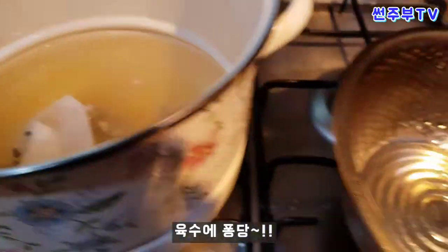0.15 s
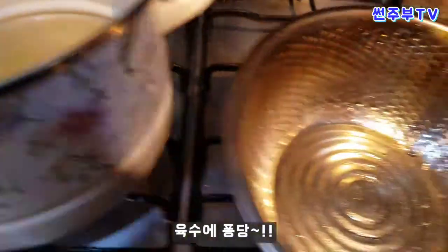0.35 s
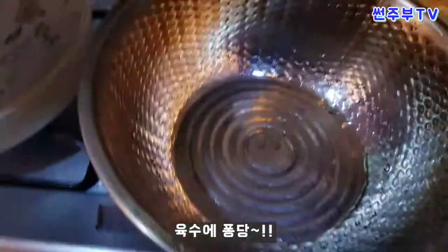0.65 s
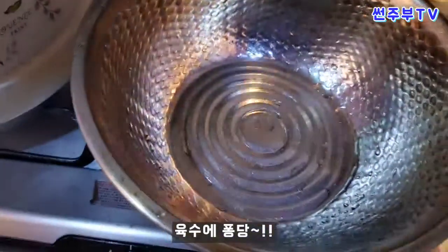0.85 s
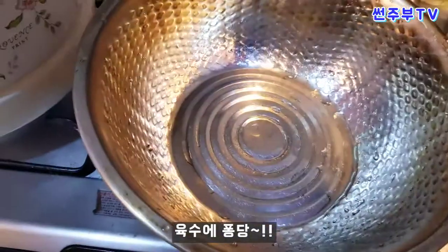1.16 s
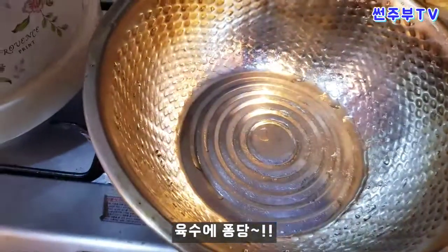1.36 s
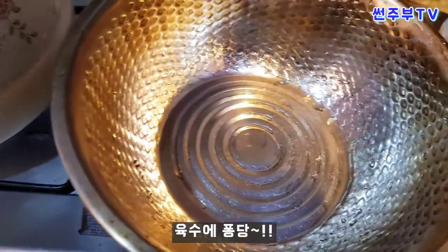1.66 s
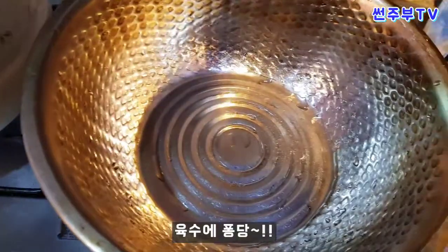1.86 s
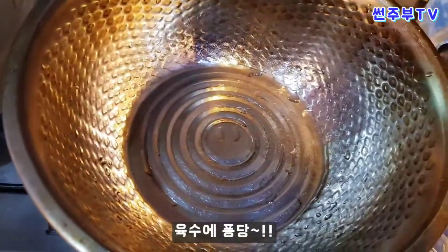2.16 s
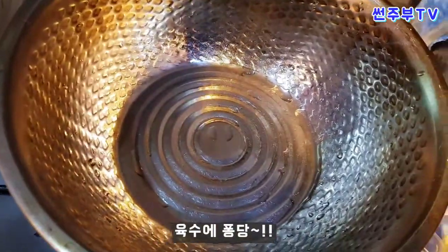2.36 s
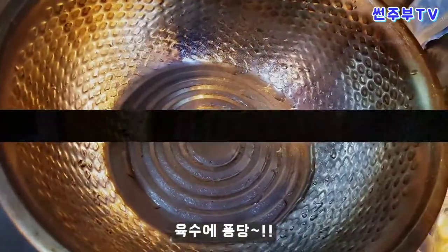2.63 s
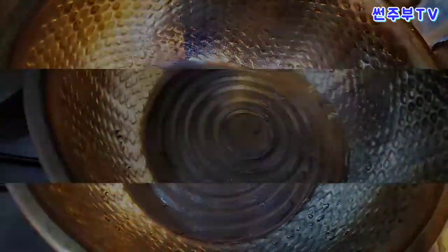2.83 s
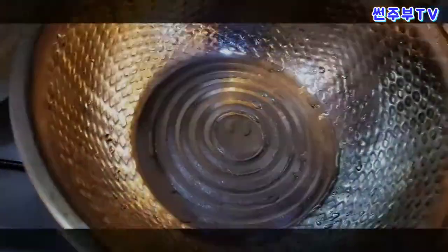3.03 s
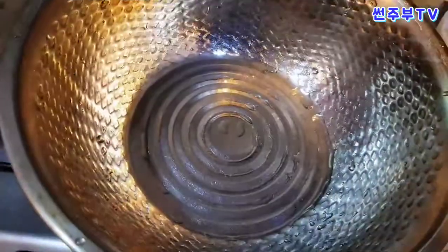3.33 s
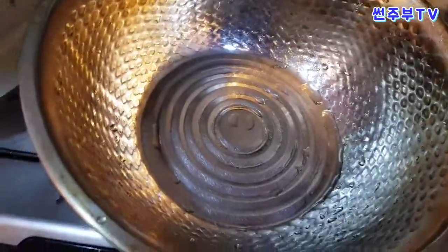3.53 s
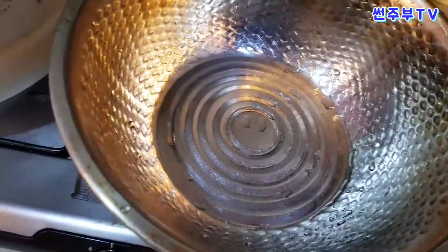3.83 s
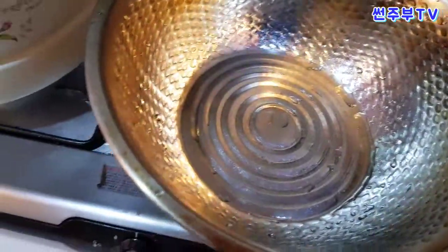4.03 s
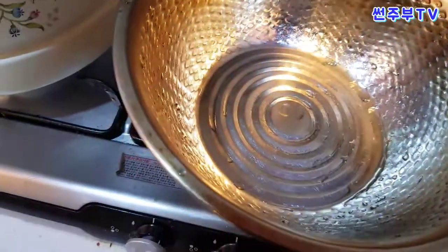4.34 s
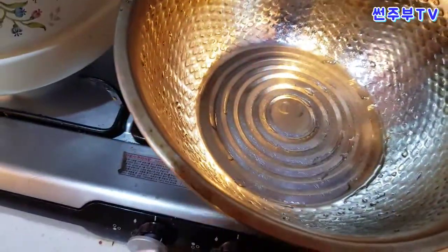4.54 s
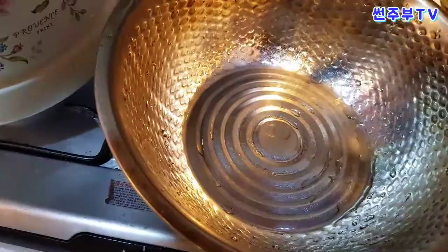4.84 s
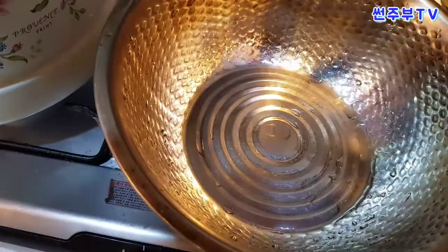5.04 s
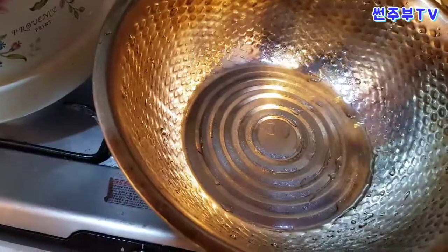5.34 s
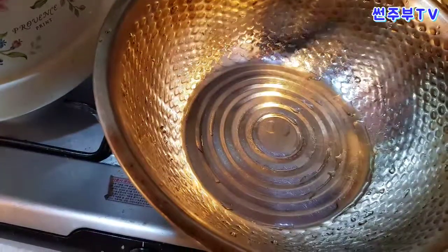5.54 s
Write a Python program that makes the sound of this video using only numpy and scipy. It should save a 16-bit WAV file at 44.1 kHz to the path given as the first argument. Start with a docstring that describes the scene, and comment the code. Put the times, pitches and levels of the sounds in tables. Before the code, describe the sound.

Loud surging hiss and metal pot knocks break over a gas ring, cut off, and leave a faint burner hum with rustles.

```python
"""A gas ring hisses and hums in a home kitchen, moving to the left as a hand turns two microphones.
Rustles, ticks and a first dull knock on a pot come over it. Near 1 s a loud, surging, spray-like hiss
breaks in close by, and more knocks set the pot ringing. At 2.3 s the sound drops out for a moment.
Then the burner carries on, fainter, under a short rustle, small ticks and the taps and bumps of handling."""
import sys
import numpy as np
from scipy import signal
from scipy.fft import rfft, irfft, next_fast_len
from scipy.io import wavfile

SR = 44100
rng = np.random.default_rng(int(sys.argv[2]) if len(sys.argv) > 2 else 0)


def waveform_to_disk(signal):
    """Save audio, clipped to [-1, 1], as 16-bit WAV at the path in sys.argv[1]."""
    frames = np.transpose(np.atleast_2d(signal))
    scaled = np.clip(frames, -1, 1) * 32767
    samples = np.round(scaled).astype(np.int16)
    wavfile.write(sys.argv[1], SR, samples)


N = 250929
TIME = np.arange(N) / SR
FFT_SIZE = next_fast_len(N)
HZ = np.maximum(np.arange(FFT_SIZE // 2 + 1) * SR / FFT_SIZE, 1)
MIC_LAG_S = 0.00027   # sound reaches one microphone this much later
DROPOUT_START_S, DROPOUT_END_S = 2.3333, 2.3722


def burner():
    """A gas jet hisses through the hollows of the burner head, over a low roar and a wavering hum."""
    # loudness of the jet: time_s, level_db
    jet_levels = [(0, -46.5), (.25, -45), (.5, -45.5), (.83, -43), (2.35, -43.5), (2.37, -54.5),
                  (3.2, -53.5), (3.85, -51.5), (4.3, -53), (4.65, -50.5), (5.04, -53), (5.13, -51),
                  (5.3, -50.5), (5.69, -50.5)]
    # tone of the jet and of the roar: pitch_hz, level_db
    jet_tone = [(710, -34), (1200, -9.5), (1610, -6.5), (1930, -14), (2090, -14.5), (2560, -11.5),
                (3110, -14), (4220, -12), (4960, -7), (8350, -11), (10700, -1.5), (13900, -4.5),
                (16000, -9.5)]
    roar_tone = [(12, -36), (20, -18), (49, 0), (118, -5), (154, -1), (259, -9.5), (297, -3), (412, -6.5),
                 (606, -7), (707, -10.5), (2000, -17.5), (2600, -55), (4400, -120)]
    # how far left each leans: pitch_hz, left_minus_right_db
    jet_pan = [(1000, 1), (6000, -1), (7400, -6.5), (8500, -1.5), (14300, 0), (15500, 5)]
    roar_pan = [(60, 7.5), (110, 6), (200, 10.5), (380, 13.5), (700, 9), (1290, 17), (2380, 11.5),
                (4400, 13.5), (8120, 10.5), (15000, 13.0)]
    # hollows that lift or dip the hiss: pitch_hz, width_hz, lift_db
    hollows = [(1640, 220, 3), (2600, 650, 3), (3174, 266, 8), (3520, 62, -14), (5010, 310, 10),
               (5830, 230, -2.5), (6050, 210, 5), (6430, 410, -2.5), (7240, 590, 10), (8700, 250, -3),
               (10700, 180, 4.5), (11300, 180, 2), (12500, 270, 3), (14000, 380, 6.5), (4200, 580, -1)]
    # tones of the hum: pitch_hz, width_hz, early_db, late_db
    hum_tones = [(292.9, 4.4, -68.5, -66), (618, 17.5, -92, -64), (162.6, 22, -74.5, -74.5),
                 (2304, 85, -76.5, -71.5), (385, 19, -83, -93)]
    jet_db = over_time(jet_levels)
    roar_db = jet_db - 3
    turn_db = np.interp(TIME, [0, 0.41], [3.5, 12])   # the hand turns until the jet lies on the left
    lift_db = sum(db * np.exp(-((HZ - hz) / width) ** 2) for hz, width, db in hollows)
    jet = stereo_noise(rng.standard_normal((3, FFT_SIZE)), over_pitch(jet_tone) + lift_db,
                       over_pitch(jet_pan), -MIC_LAG_S, flicker_db=1.5, flicker_hz=7.6)
    roar = stereo_noise(rng.standard_normal((3, FFT_SIZE)), over_pitch(roar_tone),
                        over_pitch(roar_pan), -MIC_LAG_S, flicker_db=.8, flicker_hz=6)
    hum = 0
    for hz, width, early_db, late_db in hum_tones:
        tone = ring(rng.standard_normal(N), hz, np.log(1000) / (np.pi * width))
        hum = hum + gain(np.interp(TIME, [1.8, 5], [early_db, late_db])) * tone / tone.std()
    hum = hum * gain(roar_db - roar_db.min()) * sides(14)[:, None]   # the hum grows with the roar
    return jet * gain(jet_db) * sides(turn_db) + roar * gain(roar_db) + hum


def loud_hiss():
    """Very dense clicks, like droplets or grains, blur into a hiss that is brighter when louder."""
    # surges of the hiss: time_s, level_db
    surges = [(0.93, -46), (0.96, -38.5), (0.984, -24.5), (1.004, -21.5), (1.108, -27.5), (1.12, -23),
              (1.206, -21), (1.238, -26.5), (1.308, -23), (1.326, -27), (1.366, -21), (1.564, -27),
              (1.674, -21.5), (1.694, -25.5), (1.802, -26), (1.936, -21), (2.002, -26), (2.126, -20),
              (2.236, -26), (2.282, -24.5), (2.33, -28.5)]
    # its tone: pitch_hz, level_db
    spray_tone = [(24, -46), (40, -25), (147, -8.5), (249, -10.5), (392, -3.5), (585, -8.5), (918, -2),
                  (1210, -6), (1440, 1), (1720, -3), (2630, -2), (8550, -4), (11600, 0.5), (14800, -0.5),
                  (16000, -6.5)]
    # how far left it leans: pitch_hz, left_minus_right_db
    spray_pan = [(60, -2), (110, 7), (200, 3), (380, 4), (700, 4), (1290, 0.5), (2380, 2), (4400, 0.0),
                 (8120, -0.5), (15000, 0.0)]
    level_db = over_time(surges)
    hiss = stereo_noise(grains(per_s=20000, spread_db=1.5), over_pitch(spray_tone),
                        over_pitch(spray_pan), MIC_LAG_S, flicker_db=.5, flicker_hz=14)
    treble = signal.sosfiltfilt(soft_filter(8500, "high"), hiss)
    treble_gain = gain(0.4 * (level_db + 24))
    sounding = (TIME > surges[0][0]) & (TIME < DROPOUT_END_S)
    return (hiss + treble * (treble_gain - 1)) * gain(level_db) * sounding


def pot_knocks():
    """A blow and a brief rough contact set the pot ringing; soft knocks favour a few of its tones."""
    # knocks: start_s, peak_db, left_minus_right_db, favoured_hz, spread_octaves, contact_s
    knocks = [(0.365, -33, 5, 880, 0.54, 0.034), (1.017, -25.5, 5, 385, 0.24, 0.042),
              (1.052, -27, 7, 364, 0.54, 0.039), (1.337, -23.5, 9.5, 442, 1.1, 0.03),
              (1.5322, -7, 6.5, 600, 3.3, 0.018), (1.813, -22.5, 6, 577, 0.35, 0.045)]
    # the pot's own tones: pitch_hz, level_db, ring_s, left_minus_right_db
    pot_tones = [(167, -8.5, 0.14, -9), (215, -6, 0.13, 6.5), (319, -6, 0.1, -10), (390, 5.5, 0.079, 0.5),
                 (501, -3, 0.094, -8), (589, -11, 0.16, 6), (779.7, -3, 0.064, 4), (1027, -5, 0.034, 12),
                 (1204, 6, 0.037, 3.5), (1458, 5, 0.096, 0.5), (1550, -4.5, 0.063, 20.5),
                 (1832, -7.5, 0.1, 18.5)]
    out, t = np.zeros((2, N)), TIME[:SR // 3]
    for start_s, peak_db, pan_db, favoured_hz, spread, contact_s in knocks:
        knock = 0
        for hz, tone_db, ring_s, tone_pan_db in pot_tones:
            fade = np.exp(-t / contact_s * (hz / 400) ** 0.94)   # the contact dulls as it settles
            contact = rng.standard_normal(len(t)) * fade
            blow = 9.1 * (t == 0) * rng.choice([-1, 1])
            tone = ring(contact + blow, hz, ring_s)
            level_db = tone_db - 6.4 * (np.log2(hz / favoured_hz) / spread) ** 2
            flip = np.array([1, np.sign(900 - hz)])   # the microphone gap flips high tones on one side
            knock = knock + np.outer(flip * sides(tone_pan_db), tone) / abs(tone).max() * gain(level_db)
        knock = signal.sosfilt(soft_filter(120, "high"), knock)
        place(out, start_s, knock / abs(knock.mean(0)).max() * gain(peak_db), pan_db)
    return out


def rustle():
    """Cloth or thin film crinkles near the microphones, crisp above 2.5 kHz and dull below."""
    # strokes: loudest_s, build_up_s, crisp_db, dull_db, left_minus_right_db
    strokes = [(.22, 0.04, -39.5, -52, 3), (.43, .06, -60, -52, 1), (.52, .04, -51, -62, 8),
               (.63, .03, -47, -57, -2), (.78, 0.083, -45, -52, 8.5), (.86, 0.059, -41.5, -43.5, 12.5),
               (.96, 0.068, -39, -49, 14), (3.27, .012, -56, -66, 0), (3.32, .03, -54, -70, 1),
               (3.42, 0.048, -41.5, -53, 3), (3.5, 0.063, -44, -54, 4), (3.575, 0.064, -48, -49, 10),
               (3.64, 0.03, -53, -54, 11.5), (3.74, 0.059, -54, -64, 10), (3.8, .03, -58, -64, 8)]
    # tone of the crinkles: pitch_hz, level_db
    crinkle_tone = [(180, -20), (300, -8), (528, -14), (870, -4), (1140, -2.5), (1900, -6), (4090, -10),
                    (13100, -17), (16000, -9.5)]
    fade_s = 0.058
    crisp_power, dull_power = np.zeros((2, 2, N))
    for loudest_s, build_up_s, crisp_db, dull_db, pan_db in strokes:
        t = TIME - loudest_s
        swell = np.exp(-np.where(t < 0, (t / build_up_s) ** 2, t / fade_s))
        stroke = np.outer(sides(pan_db), swell)
        crisp_power += (gain(crisp_db) * stroke) ** 2
        dull_power += (gain(dull_db) * stroke) ** 2
    crinkles = stereo_noise(grains(per_s=4000, spread_db=1.7), over_pitch(crinkle_tone),
                            np.zeros_like(HZ), MIC_LAG_S, flicker_db=1, flicker_hz=54)
    dull = signal.sosfiltfilt(soft_filter(2500, "low"), crinkles)
    crisp = crinkles - dull
    return crisp / crisp.std() * np.sqrt(crisp_power) + dull / dull.std() * np.sqrt(dull_power)


def bright_ticks():
    """Each small tick is two bursts of noise: a snap and a higher fizz."""
    # ticks: start_s, snap_db, left_minus_right_db, fizz_db
    ticks = [(0.152, -37, 11, -40.5), (0.5531, -32.5, 20, -44), (0.558, -36, 8, -32), (0.627, -34, 12, -30),
             (0.849, -27.5, 10, -38), (3.2606, -55, -2, -30), (3.278, -53, 1, -34), (3.3044, -55, -5, -35),
             (3.409, -44, -7, -27), (3.4128, -40, 1, -24), (3.469, -35, -2, -32), (3.615, -45, -2, -32),
             (3.6844, -43, 12, -37), (3.745, -52, -1, -22), (3.758, -50, 9, -42), (4.897, -44.5, 13, -39),
             (5.1313, -36, 5, -26.5)]
    out, fade_s = np.zeros((2, N)), 0.0022
    for start_s, snap_db, pan_db, fizz_db in ticks:
        snap = gain(snap_db) * burst(fade_s, band_hz=[2050, 4100], tail_db=-15.5)
        fizz = gain(fizz_db) * burst(fade_s, band_hz=[5200, 21500], tail_db=-17.5)
        place(out, start_s, snap + fizz, pan_db)
    return out


def finger_taps():
    """Fingers tap the microphones' case, each making a short, dull burst."""
    # taps: start_s, peak_db, left_minus_right_db
    taps = [(0.2188, -34, 4), (0.622, -26, 5), (0.8869, -25.5, 11.5), (3.459, -33.5, 14), (3.624, -38, 10),
            (3.633, -37, 14), (3.7772, -33, 14), (4.1368, -34.5, 17), (4.162, -50, 3), (4.5015, -42, 13),
            (4.5652, -36, 21), (4.6695, -46, 15), (5.0662, -40, 9), (5.1328, -35, 8)]
    out = np.zeros((2, N))
    for start_s, peak_db, pan_db in taps:
        tap = burst(fade_s=0.0011, band_hz=[114, 1440], tail_db=-21)
        place(out, start_s, gain(peak_db) * tap, pan_db)
    return out


def hand_bumps():
    """The hand sends low thuds through the case, mostly to the left microphone."""
    # bumps: start_s, level_db, pitch_hz, length_s
    bumps = [(.21, -37, 155, 0.02), (3.561, -47, 63, 0.054), (3.821, -52, 45, 0.073),
             (4.496, -47, 40, 0.048), (4.502, -43, 300, 0.044), (4.663, -43.5, 248, 0.033),
             (4.562, -37, 130, 0.016), (5.536, -47, 40.5, 0.14)]
    out, t = np.zeros((2, N)), TIME[:SR // 2]
    for start_s, level_db, hz, length_s in bumps:
        push = rng.standard_normal(len(t)) * t * np.exp(-2 * t / length_s)
        thud = ring(push, hz, ring_s=1.4 / hz)
        place(out, start_s, thud / abs(thud).max() * gain(level_db), pan_db=15)
    return out


def stereo_noise(noises, tone_db, pan_db, lag_s, flicker_db, flicker_hz):
    """Blend three noises into a stereo pair whose ten octaves flicker in level."""
    # how alike the two microphones sound: pitch_hz, shared_fraction
    likeness = [(20, 0.36), (300, 0.97), (1400, 0.85), (2500, .25), (4500, 0.1), (16000, 0.016)]
    shared, left, right = rfft(noises)
    alike = np.clip(over_pitch(likeness), 0, 1)
    delay = np.exp(-1j * np.pi * HZ * lag_s)
    pair = np.sqrt(alike) * shared * np.array([delay, 1 / delay])
    pair += np.sqrt(1 - alike) * np.array([left, right])
    pair = pair * gain(tone_db) * sides(pan_db)
    out, shared_drift = 0, 0.99 * drift(flicker_hz / 2)
    for octave in range(10):
        band = np.clip(1 - abs(np.log2(HZ / 32).clip(0, 9) - octave), 0, 1)
        flicker = gain(flicker_db * (shared_drift + drift(flicker_hz)))
        out = out + irfft(pair * band, FFT_SIZE)[:, :N] * flicker
    return out / out.mean(0).std()


def grains(per_s, spread_db):
    """Three streams of uneven clicks: shared, left and right."""
    shape = (3, FFT_SIZE)
    sizes = gain(spread_db * np.minimum(rng.exponential(1, shape), 3)) * rng.standard_normal(shape)
    clicks = sizes * (rng.random(shape) < per_s / SR)
    return clicks / clicks.std()


def burst(fade_s, band_hz, tail_db):
    """A stereo puff of noise with a quick rise and a faint tail."""
    t = TIME[:SR // 12]
    rise = np.minimum(t / 0.00097, 1)
    fall = np.exp(-t / fade_s) + gain(tail_db) * np.exp(-t / 0.06)
    puff = signal.sosfilt(soft_filter(band_hz, "band"), rng.standard_normal((2, len(t))) * rise * fall)
    return puff / abs(puff).max(1, keepdims=True)


def ring(push, hz, ring_s):
    """A push starts a tone that fades by 60 dB in ring_s."""
    decay, angle = gain(-60 / (ring_s * SR)), 2 * np.pi * hz / SR
    return signal.lfilter([0, np.sin(angle)], [1, -2 * decay * np.cos(angle), decay * decay], push)


def drift(hz):
    """A random curve that wanders around zero."""
    count = int(N * 2 * hz // SR + 2)
    return np.interp(TIME * 2 * hz, np.arange(count), rng.standard_normal(count))


def soft_filter(hz, kind):
    """A gentle filter that keeps the lows, the highs or a band."""
    return signal.butter(2, hz, kind, fs=SR, output="sos")


def gain(db):
    """Turn decibels into a multiplier."""
    return 10 ** (np.asarray(db) / 20)


def sides(pan_db):
    """Left and right gains; positive leans left."""
    return gain(np.array([pan_db, -pan_db]) / 2)


def over_time(table):
    """Read a table at every sample."""
    return np.interp(TIME, *np.transpose(table))


def over_pitch(table):
    """Read a table at every frequency in HZ."""
    hz, values = np.transpose(table)
    return np.interp(np.log(HZ), np.log(hz), values)


def place(out, start_s, sound, pan_db):
    """Mix a sound in at a time and a side."""
    i = round(start_s * SR)
    stereo = sound * sides(pan_db)[:, None]
    out[:, i:i + stereo.shape[1]] += stereo[:, :N - i]


def scene():
    """All the sounds at the two microphones."""
    return burner() + loud_hiss() + rustle() + pot_knocks() + bright_ticks() + finger_taps() + hand_bumps()


def record(dry):
    """The sound drops out and snaps back; peaks are rounded and the highest treble is cut."""
    in_dropout = (TIME > DROPOUT_START_S) & (TIME < DROPOUT_END_S)
    fade_db = np.maximum(-7 - 3300 * (TIME - DROPOUT_START_S), -51)   # a step down, then a fast fade
    dipped = dry * gain(fade_db * in_dropout)
    rounded = 1.1 * np.tanh(dipped / 1.1)
    cutoff_hz = 15720
    return signal.sosfilt(signal.ellip(12, .5, 70, cutoff_hz, fs=SR, output="sos"), rounded)


dry = scene()
out = record(dry)
waveform_to_disk(out)
```